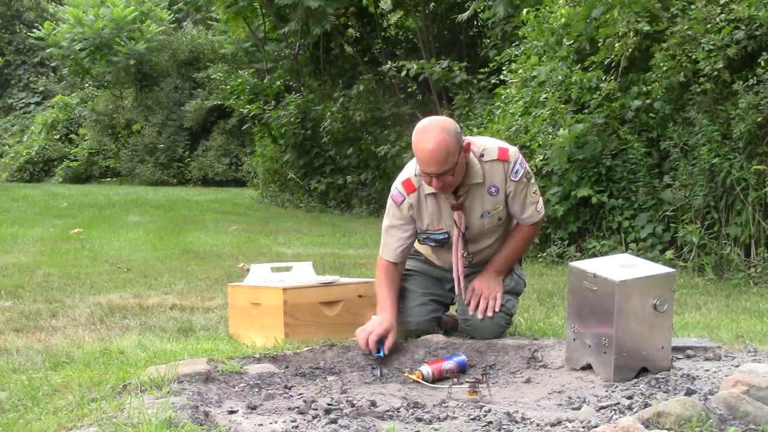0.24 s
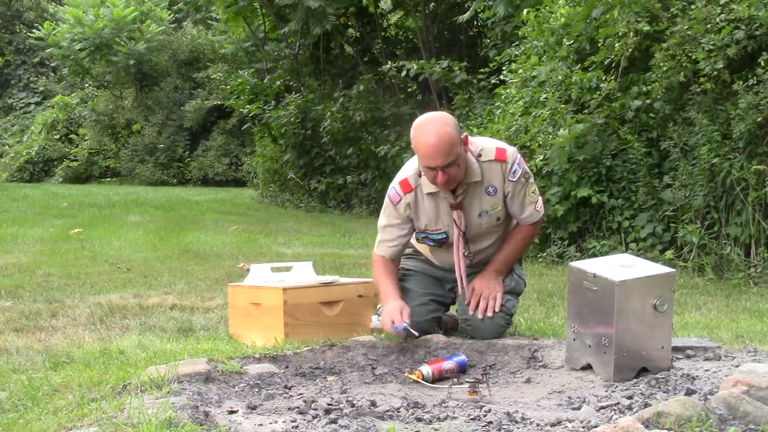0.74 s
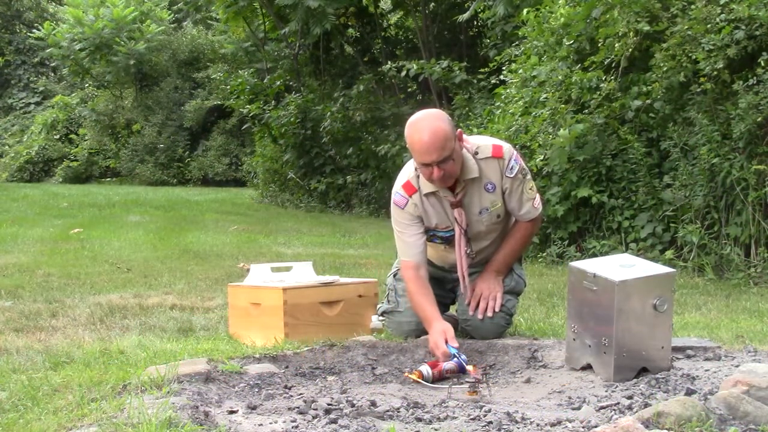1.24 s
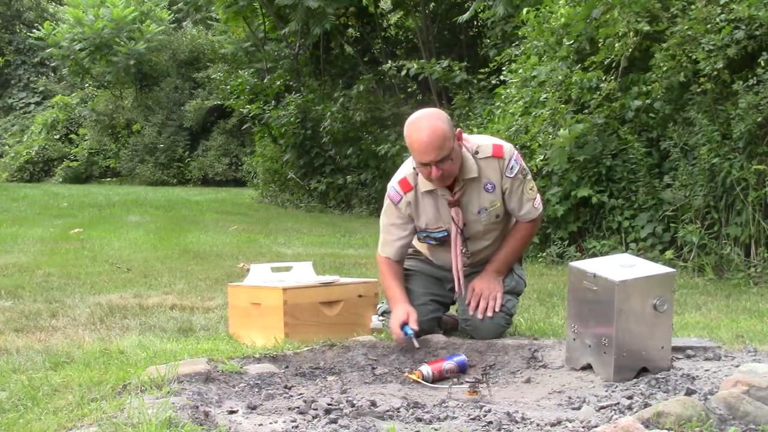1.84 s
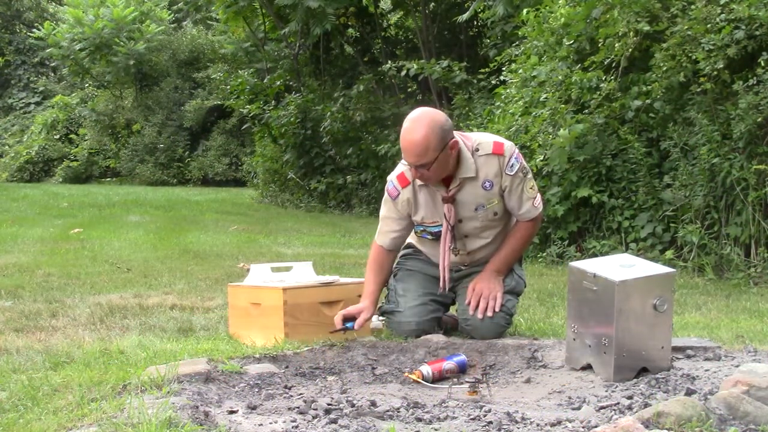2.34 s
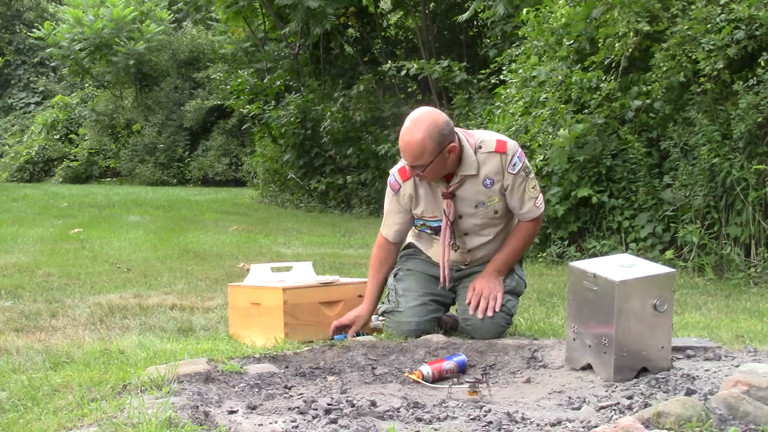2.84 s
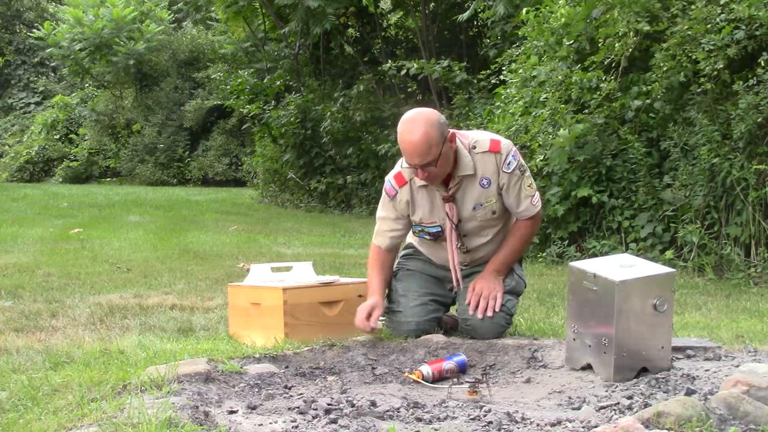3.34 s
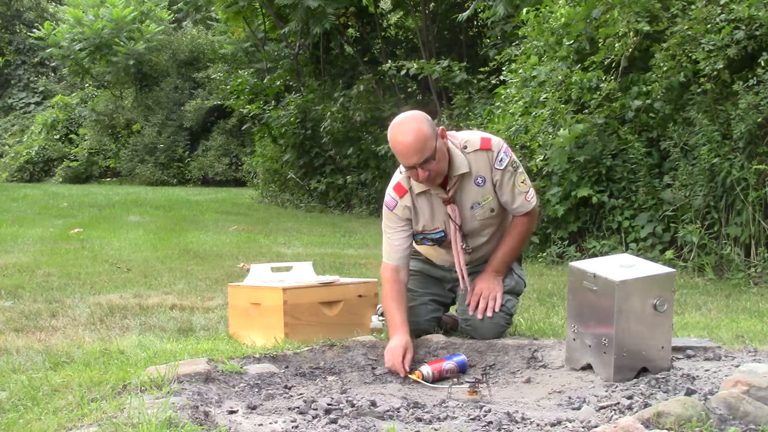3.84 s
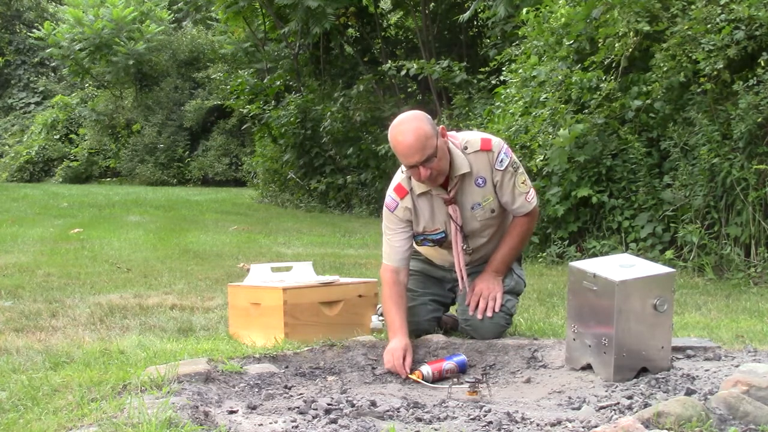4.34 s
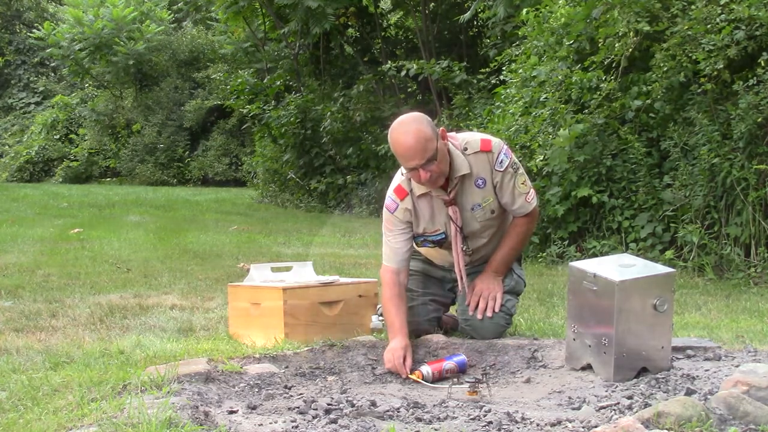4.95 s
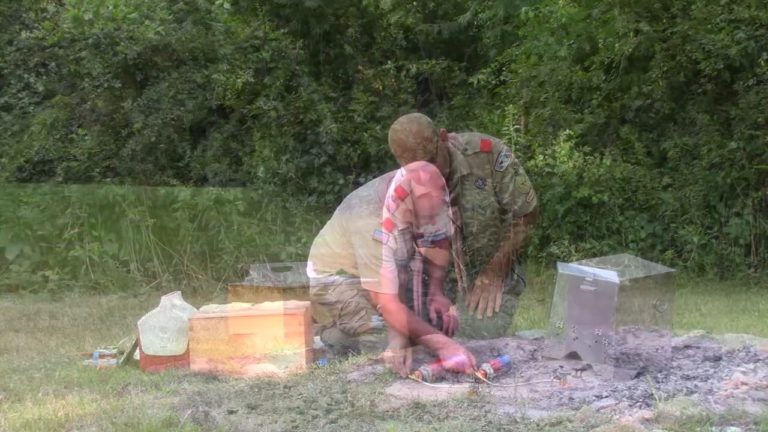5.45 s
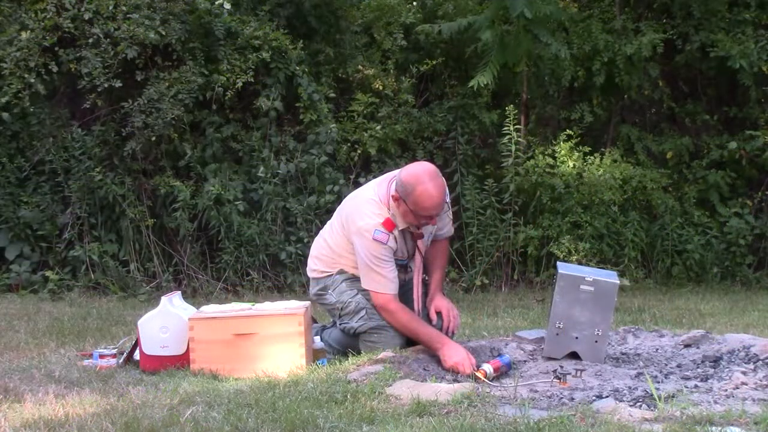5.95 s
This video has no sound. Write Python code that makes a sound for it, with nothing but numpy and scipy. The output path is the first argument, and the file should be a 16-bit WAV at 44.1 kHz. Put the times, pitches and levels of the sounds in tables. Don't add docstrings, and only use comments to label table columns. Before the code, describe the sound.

Thin whistling gas hiss, plastic clicks and two sharp lighter snaps, a soft whoomp of ignition, then steady flame, duller and stronger at the end.

```python
import sys
import numpy as np
from scipy import signal
from scipy.fft import irfft
from scipy.io import wavfile

SR = 44100
rng = np.random.default_rng(int(sys.argv[2]) if len(sys.argv) > 2 else 0)


def decibels_to_gain(level_db):
    exponent = np.asarray(level_db, float) / 20
    return 10 ** exponent


def master(y):
    cut = np.clip(np.atleast_2d(y).T, -1, 1)
    pcm = np.round(cut * 32767)
    wavfile.write(sys.argv[1], SR, pcm.astype(np.int16))


N = 273420
TIME_S = np.arange(N) / SR
CATCH_S = 1.2582
CUT_S = 5.397

# pitch_hz, level_db [dB per Hz]
RUMBLE_COLOUR = [(8.8, -37), (15, -20), (64, -5.5), (86, -8.5), (124, -13), (142, -8), (173, -12.5),
                 (226, -14), (644, -20), (800, -30.5), (1040, -52), (1760, -120)]


def in_time(rows):
    s, *columns = np.transpose(rows)
    return [np.interp(TIME_S, s, c) for c in columns]


def swells(rows):
    return sum(rise * np.exp(-np.abs((TIME_S - s) / width) ** 3.3) for s, rise, width in rows)


def rms_one(x):
    return x / np.sqrt(np.mean(x ** 2) + 1e-20)


def drift(rate):
    r = np.exp(-80 * np.pi * rate / SR)
    chance = rng.standard_normal(N // 40 + 2002)
    slow = signal.lfilter([1], [1, -2 * r, r * r], chance)[2000:]
    return np.interp(np.arange(N) / 40, np.arange(len(slow)), rms_one(slow))


def coloured(spectrum, low_hz, high_hz, shared_db, own_db, rate):
    hz = np.fft.rfftfreq(N, 1 / SR) + 1e-3
    points = np.array(spectrum)
    chance = rng.standard_normal(len(hz)) + 1j * rng.standard_normal(len(hz))
    noise = chance * decibels_to_gain(np.interp(np.log(hz), np.log(points[:, 0]), points[:, 1]))
    edges = np.geomspace(low_hz, high_hz, 2 + int(1.5 * np.log2(high_hz / low_hz)))
    together_db = shared_db * drift(rate)
    total = np.zeros(N)
    for low, high in zip(edges, edges[1:]):
        band = irfft(noise * (hz >= low) * (hz < high), N)
        total += decibels_to_gain(together_db + own_db * drift(rate)) * band
    return rms_one(total)


def narrow(hz, width_hz):
    lowpass = signal.butter(2, width_hz / 2, fs=SR, output="sos")
    slow = signal.sosfilt(lowpass, rng.standard_normal((2, N + SR)))[:, SR:]
    phase = 2 * np.pi * np.cumsum(hz * np.ones(N)) / SR
    return rms_one(slow[0] * np.cos(phase) + slow[1] * np.sin(phase))


def resonator(hz, width_hz):
    r = np.exp(-np.pi * width_hz / SR)
    return np.array([1, 0, -1]) * (1 - r * r) / 2, [1, -2 * r * np.cos(2 * np.pi * hz / SR), r * r]


def resonate(x, hz, width_hz):
    return signal.lfilter(*resonator(hz, width_hz), x)


def cancel(x, hz, depth, width_hz):
    band, state = np.zeros(N), np.zeros(2)
    for i in range(0, N, 1024):
        zeros, poles = resonator(hz[i], width_hz)
        band[i:i + 1024], state = signal.lfilter(zeros, poles, x[i:i + 1024], zi=state)
    return x - depth * band


def add(out, s, piece):
    i = round(s * SR)
    out[i:i + len(piece)] += piece[:N - i]


def blips(rows):
    out, t = np.zeros(N), np.arange(-1000, 1000) / SR
    for s, db, hz, width in rows:
        add(out, s + t[0], decibels_to_gain(db) * np.exp(-(t / width) ** 2) * np.cos(2 * np.pi * hz * t))
    return out


def jet_turbulence(flow_db, bright_db, lit, share):
    edges_hz = [2950, 5500, 9050, 11100, 15900]
    # pitch_hz, level_db [dB per Hz]
    cold_colour = [(1590, -35), (2700, -2), (3200, -7), (3530, -7), (3830, -10.5), (5630, 2.5), (6480, 11),
                   (8160, -11), (14200, -13), (15200, -11), (15900, -12)]
    # pitch_hz, level_db [dB per Hz]
    burning_colour = [(2900, -5), (3350, 1), (3900, 1.5), (5300, -5), (6050, -7), (6700, -1), (7200, -10.5),
                      (8300, -4.5), (9050, -7.5), (9900, -3), (10500, -7.5), (11200, -17), (13000, -18),
                      (15900, -17)]
    # unlit_db, burning_db [over the flow], tilt [share of the brightness change taken]
    regions = [(-2.5, -2.5, 0.01), (-8.5, -9, 0.79), (-17.5, -14, 1.4), (-17, -17.5, 1.2)]
    jet = np.zeros(N)
    for (cold_db, lit_db, tilt), low, high in zip(regions, edges_hz, edges_hz[1:]):
        cold = coloured(cold_colour, low, high, shared_db=1.5, own_db=3.0, rate=6.5)
        burning = coloured(burning_colour, low, high, shared_db=0.5, own_db=1.14, rate=18.0)
        db = flow_db + cold_db + lit * (lit_db - cold_db) + tilt * bright_db
        jet += decibels_to_gain(db) * (np.sqrt(1 - share) * cold + np.sqrt(share) * burning)
    return jet


def whistles(flow_db, nozzle_hz, lit, share):
    # start_s [centre], rise_db, width_s
    nozzle_swells = [(.63, 4, 0.069), (.84, 5.5, 0.046), (1.05, 5, 0.19), (1.85, -2, .15), (2.75, -2, 0.16),
                     (3.05, -3, 0.096), (3.55, 1, 0.11), (4.3, 2, 0.2), (4.76, -5.5, 0.19),
                     (5.2, 1.5, 0.12)]
    # start_s [centre], rise_db, width_s
    middle_swells = [(.45, 2, .1), (.76, 6, 0.056), (1.55, 8, 0.19), (1.9, 5, 0.19), (2.35, 7.5, .2),
                     (3.35, 6, .15), (3.55, 3, 0.036), (4.1, 0, 0.21), (4.9, 2, 0.11), (5.23, 8, 0.19)]
    top_swells = [(2.05, 11, 0.16), (2.72, 3.7, 0.09), (3.15, 3.4, 0.046), (3.55, 5.5, 0.054),
                  (4.0, 12, 0.09), (4.22, 9.7, 0.091), (4.85, 6.2, 0.2), (5.2, 8.7, 0.14)]
    # start_s, pitch_hz
    top_pitch = [(1.4, 9850), (2.1, 10080), (2.6, 10000), (2.72, 10450), (3.05, 9900), (3.15, 10400),
                 (3.55, 10150), (3.9, 9950), (5.05, 9950), (5.39, 10150)]

    nozzle_db = flow_db - 5.5 + 0.5 * lit + swells(nozzle_swells) + 1.3 * drift(2.3)
    nozzle = decibels_to_gain(nozzle_db) * narrow(nozzle_hz, width_hz=550)

    middle_hz = 7450 - 250 * lit
    middle_db = flow_db - 13.5 + swells(middle_swells) + 1.5 * drift(6.0)
    middle = decibels_to_gain(middle_db) * narrow(middle_hz, width_hz=970)

    top_hz = in_time(top_pitch)[0] * (1 + 0.01 * drift(2.5))
    top_db = flow_db - 18 + swells(top_swells) + 2.8 * drift(5.5)
    top = share * decibels_to_gain(top_db) * narrow(top_hz, width_hz=560)
    return nozzle + middle + top


def rim_sizzle(flow_db):
    rim_swells = [(1.57, 8, .04), (2.25, 11, 0.38), (3.4, 7, 0.19), (4.7, 1, 0.2), (5.27, 11, .12)]
    return decibels_to_gain(flow_db - 28 + swells(rim_swells)) * narrow(14800, width_hz=1600)


def gas_hiss():
    # start_s, flow_db, nozzle_hz, bright_db [at tilt 1]
    valve = [(0.0, -51, 6400, 2), (.22, -49, 5650, 1), (.4, -50, 6400, 2), (.62, -49.5, 5750, 3),
             (.75, -49, 6530, 3), (.88, -50.5, 6400, -2), (.93, -47.5, 5620, 3.5), (1.18, -50, 5470, 0),
             (1.3, -52, 6000, 2), (1.6, -52.5, 5490, 3), (1.9, -55.5, 6100, 3.5), (2.4, -51.5, 6420, -2.5),
             (2.65, -54.5, 5990, -1), (3.2, -55.5, 6100, 1.5), (3.95, -49.5, 6040, -2.5),
             (4.6, -49, 5990, -3), (4.97, -49, 5850, -5), (5.03, -48, 6100, -2.5), (5.09, -47.5, 6100, -4),
             (5.13, -47.5, 6100, -1.5), (5.38, -48, 6120, 4.5)]
    # start_s [centre], change_db [at tilt 1], width_s
    shades = [(1.53, -3, .04), (1.75, 0, .1), (2.1, 1, 0.13), (3.03, -7, 0.052), (3.68, -7, 0.046),
              (4.38, -4, .04), (4.22, 4, .03), (5.3, -1.5, .08)]
    # start_s, share of the burning colour [0-1]
    settled = [(1.25, 0.44), (1.9, 0.86), (3.4, 0.96), (3.75, 0.98)]
    flow_db, nozzle_hz, bright_db = in_time(valve)
    bright_db = bright_db + swells(shades)
    share = np.clip(in_time(settled)[0], 0, 1)
    lit = np.clip((TIME_S - CATCH_S) / .3, 0, 1)
    jet = jet_turbulence(flow_db, bright_db, lit, share)
    jet = jet + whistles(flow_db, nozzle_hz, lit, share) + rim_sizzle(flow_db)
    return (TIME_S < CUT_S) * jet


def far_engine():
    # start_s, level_db
    load = [(0, -47), (.55, -48.5), (.72, -48.5), (.9, -47.5), (1.2, -46), (1.5, -52), (2.1, -50.5),
            (3.0, -46), (3.8, -50.5), (4.5, -45.5), (5.3, -49.5), (5.45, -44), (5.7, -53), (6.05, -48)]
    # pitch_hz, level_db, pitch wobble [0-1]
    hum_tones = [(58.7, -47.5, 0.01), (117.1, -50, 0)]
    (rumble_db,) = in_time(load)
    rumble = decibels_to_gain(rumble_db) * coloured(RUMBLE_COLOUR, 38, 800, shared_db=2.05, own_db=2.0, rate=4.4)
    hum = np.zeros(N)
    for hz, db, wobble in hum_tones:
        phase = 2 * np.pi * np.cumsum(hz * (1 + wobble * drift(6.1))) / SR
        hum_db = db + 0.82 * (rumble_db + 42.5) + 1.1 * drift(4.8)
        hum += decibels_to_gain(hum_db) * np.sqrt(2) * np.sin(phase)
    return rumble + (TIME_S < CUT_S) * hum


def wind():
    gusts = [(.05, 10, 0.13), (.5, 11, 0.073), (1.25, 15, 0.6), (1.85, 7, .15), (3.7, 5, .2), (5.1, 7, .3),
             (5.5, 13, 0.11), (6.05, 21, 0.3)]
    wind_db = -60 + swells(gusts)
    push = decibels_to_gain(wind_db) * coloured(RUMBLE_COLOUR, 8.1, 41, shared_db=5.0, own_db=0.0, rate=4.0)
    buffet = decibels_to_gain(wind_db - 2.5) * coloured(RUMBLE_COLOUR, 45, 120, shared_db=0.0, own_db=1.0, rate=5.3)
    return push + (TIME_S > CUT_S) * buffet


def leaves():
    # start_s, level_db
    breeze = [(0.0, -59), (0.13, -55), (0.31, -54), (0.75, -59.5), (1.11, -51.5), (1.87, -57.5),
              (2.01, -58), (2.34, -59.5), (3.21, -58.5), (5.02, -57.5), (5.38, -54.5)]
    # pitch_hz, level_db [dB per Hz]
    rustle_colour = [(600, -15), (800, -8.5), (1100, -6.5), (1800, -7), (2400, -8), (2700, -8), (2950, -6)]
    (breeze_db,) = in_time(breeze)
    low = coloured(rustle_colour, 600, 1800, shared_db=1.8, own_db=0.8, rate=6.3)
    high = coloured(rustle_colour, 1800, 2925, shared_db=1.0, own_db=1.5, rate=2.1)
    return (TIME_S < CUT_S) * decibels_to_gain(breeze_db - 2) * (low + high)


def bird():
    # start_s, pitch_hz, level_db
    notes_sung = [
        [(.14, 3560, -62), (.17, 3510, -56), (.22, 3470, -54), (.265, 3480, -61)],
        [(.285, 3430, -61), (.33, 3380, -52), (.37, 3330, -61), (.44, 3170, -62)],
    ]
    out = np.zeros(N)
    for note in notes_sung:
        hz, db = in_time(note)
        edge = np.clip(np.minimum(TIME_S - note[0][0], note[-1][0] - TIME_S) / 0.0084, 0, 1)
        out += np.sqrt(2) * edge * decibels_to_gain(db) * np.sin(2 * np.pi * np.cumsum(hz) / SR)
    return out


def swishes():
    brushes = [
        (.27, -50, 0.024),
        (.735, -52, 0.037),
        (1.935, -55.5, 0.028),
        (3.1, -54.5, 0.053),
        (5.92, -63, .02),
    ]
    swell = sum(decibels_to_gain(db) * np.exp(-((TIME_S - s) / width) ** 2) for s, db, width in brushes)
    band = signal.butter(2, [900, 5000], "band", fs=SR, output="sos")
    return swell * decibels_to_gain(1.9 * drift(90.0)) * rms_one(signal.sosfilt(band, rng.standard_normal(N)))


def handling():
    # start_s [centre], level_db, pitch_hz, width_s
    squeaks = [
        (.282, -45, 1750, .002),
        (.294, -41, 1750, .002),
        (.3145, -34, 1740, 0.0025),
        (.322, -42, 1800, 0.0018),
        (.724, -46, 2750, .004),
        (.738, -47, 2500, .005),
    ]
    # start_s, peak_db, pitch_hz, length_s, share of broad crackle [0-1]
    ticks = [(0.271, -40.5, 1820, 0.0043, 0.7), (0.4556, -31, 1580, 0.0023, 0.57),
             (0.463, -30, 1280, 0.0012, 0.15), (0.4575, -36, 2090, 0.004, 0.1),
             (0.4655, -35, 1050, 0.0012, 0), (0.456, -43, 7000, 0.0023, 0.1),
             (0.4605, -40, 650, 0.003, 0.3), (0.474, -38, 7000, 0.0015, 0.05),
             (0.479, -43, 1900, 0.002, 0.3), (0.495, -45, 1800, 0.0015, 0.4),
             (0.504, -46, 1200, 0.0015, 0.4), (0.466, -41, 1620, 0.004, 0.4),
             (0.689, -36.5, 6100, 0.0018, 0.4), (0.6884, -44, 8800, 0.002, 0.05),
             (0.6887, -48, 11900, 0.0015, 0.05), (0.7832, -45, 10300, 0.0015, 0.1),
             (0.79, -40, 2000, 0.002, 0.5), (0.936, -45, 3980, 0.002, 0.7),
             (1.0788, -30.5, 4700, 0.0015, 0), (1.079, -38, 1930, 0.003, 0.43),
             (1.1785, -33, 1630, 0.00096, 0.15), (1.458, -36, 1770, 0.0072, 0.57),
             (1.4657, -28.5, 2980, 0.0013, 0.7), (1.514, -43, 2600, 0.0028, 0.3),
             (3.061, -47, 1500, 0.0018, 0.56), (5.395, -44, 6200, 0.003, 0.4)]
    # start_s, peak_db, pitch_hz
    bumps = [
        (0.381, -27, 95),
        (0.491, -23, 119),
        (0.543, -26, 98.8),
        (.86, -30, 402),
        (1.927, -32, 60),
        (3.716, -32, 59.8),
        (5.39, -30, 50),
    ]
    out, t = blips(squeaks), np.arange(round(.08 * SR)) / SR
    for s, db, hz, length, broad in ticks:
        burst = rng.standard_normal(len(t)) * np.minimum(t / 0.00012, 1) * np.exp(-t / max(length, 5e-4))
        broad = np.clip(broad, 0, 1)
        crackle = resonate(resonate(burst, 3000, 5300), 3000, 5300)
        tone = 4.6 * resonate(burst, hz, 0.18 * hz)
        tick = broad * crackle + (1 - broad) * tone
        add(out, s, decibels_to_gain(db + 7.0) * tick / np.abs(tick).max())
    for s, db, hz in bumps:
        swing = np.sin(2 * np.pi * (hz * t) ** 0.68)
        add(out, s, decibels_to_gain(db - 2.5) * swing * np.exp(-t * hz) * np.minimum(t / 0.00049, 1))
    return out


def snaps():
    # start_s, level_db, rise_s
    blows = [
        (0.8826, -26, 0.00026),
        (0.8856, -5.5, 0.00052),
        (1.22, -9, 0.0004),
    ]
    # pitch_hz, level_db, t60_s
    catch_modes = [(600, 5, 0.0042), (2800, 2, .008), (5100, 6, 0.0063), (6100, -3, .008),
                   (9000, -11, .007)]
    first_modes = [(417, -17, 0.012), (1700, 3, 0.01), (2250, 3, 0.0069), (3070, 2, 0.01),
                   (3570, 2, 0.0085), (4310, -2.5, 0.015), (5320, 0.5, 0.0087), (6100, 1, 0.01),
                   (6400, -20, 0.096), (7830, -9, 0.02), (8600, 0.5, 0.0079), (9100, -11, 0.017),
                   (9400, -9, 0.009), (10400, -13, .01), (11200, -12, 0.034), (11360, -9, 0.009),
                   (11150, -8, 0.012), (12700, -9, 0.0089), (13100, -18, .012), (14260, -15, .014),
                   (15200, -12, .009), (15800, -19, .011)]
    second_modes = [(1130, -8.5, 0.02), (1700, 3.5, 0.0092), (1940, 3.5, 0.011), (2450, -5, 0.016),
                    (2700, -17.5, 0.09), (2970, -10.5, 0.014), (3490, -9.5, 0.019), (4380, 1.5, 0.0087),
                    (4690, 0, 0.005), (5030, 1, 0.0074), (6200, -6, 0.021), (7330, -6, 0.0084),
                    (7750, -8, 0.008), (8400, -10, 0.011), (9370, -13.5, 0.009), (8900, -4, .009),
                    (10840, 5, 0.013), (12000, -2, .008), (12460, 1, 0.0074), (13500, -13, 0.007),
                    (15100, 3, 0.0072), (16030, -1.5, .007), (16100, -18.5, .006)]
    out, t = np.zeros(N), np.arange(round(.08 * SR)) / SR
    highpass = signal.butter(3, 1150, "high", fs=SR, output="sos")
    for (s, db, rise), modes in zip(blows, (catch_modes, first_modes, second_modes)):
        for hz, mode_db, t60 in modes:
            turn, wait = rng.random(2)
            fall = (t / (0.72 * t60)) ** (1.6 if t60 < .025 else 1)
            onset = 1 - np.exp(-(t / rise) ** 2)
            ring = decibels_to_gain(mode_db - 60 * fall) * np.sin(2 * np.pi * (hz * t + turn)) * onset
            add(out, s + 0.00054 * wait, decibels_to_gain(db - 2.5) * ring)
        crack = resonate(rng.standard_normal(len(t)) * np.exp(-(t / 0.0021) ** 2), 3800, 7000)
        crack = signal.sosfilt(highpass, resonate(crack, 4500, 9000))
        add(out, s, decibels_to_gain(db - 6.5) * crack)
        shake = rng.standard_normal(len(t)) * np.minimum(t / .0015, 1) * np.exp(-t / 0.0045)
        add(out, s, decibels_to_gain(db - 16.0) * resonate(shake, 9000, 12000))
    return out


def ignition():
    # start_s [centre], pressure [-1..1], width_s
    puff = [
        (1.247, 0.18, 0.0035),
        (1.2582, -0.78, 0.0024),
        (1.265, 0.25, 0.0072),
    ]
    # start_s [centre], level_db, pitch_hz, width_s
    rasp = [
        (1.2523, -15, 268, 0.003),
        (1.2578, -10.5, 394, 0.0016),
    ]
    thump = sum(p * np.exp(-((TIME_S - s) / width) ** 2) for s, p, width in puff)
    return thump + blips(rasp)


def flame():
    # start_s, level_db
    strength = [(1.29, -26.5), (1.41, -30.5), (1.44, -27), (1.51, -34), (1.58, -28), (1.64, -34),
                (2.63, -35.5), (2.74, -36.5), (3.96, -33.5), (4.0, -34.5), (5.24, -34), (5.38, -32),
                (5.42, -30), (5.55, -29.5), (6.19, -32.5), (6.2, -35)]
    # pitch_hz, level_db [dB per Hz]
    flame_colour = [(53, -38), (90, -8.5), (195, -1), (371, 1), (505, -7.5), (578, -14.5), (707, -31),
                    (900, -52), (1170, -69), (1980, -120)]
    age = TIME_S - CATCH_S
    lit = np.clip(age / 0.0047, 0, 1)
    rush = coloured(flame_colour, 70, 1000, shared_db=0.5, own_db=0.23, rate=49.0)
    top = signal.sosfiltfilt(signal.butter(2, 453, "high", fs=SR, output="sos"), rush)
    muffle = np.where(TIME_S < CUT_S, 0.62 * np.exp(-(age / 0.7) ** 2), 0.18)
    return lit * decibels_to_gain(in_time(strength)[0]) * (rush - muffle * top)


def hand_echo():
    # start_s, pitch_hz, level_db
    echo_path = [(1.5, 6000, -78), (1.58, 5200, -61), (1.67, 3600, -56), (1.76, 2800, -63),
                 (1.9, 1600, -67), (2.0, 1200, -80)]
    hz, db = in_time(echo_path)
    return decibels_to_gain(db) * narrow(hz, width_hz=990)


def can_reflections(x):
    # start_s, pitch_hz [centre], depth [0-1]
    main_valley = [(1.8, 3160, 0.15), (2.1, 3250, 0.6), (3.4, 3200, 0.47), (3.8, 2980, 0.64),
                   (4.4, 2950, 0.91), (5.39, 2956, 0.8), (5.396, 3000, .0)]
    upper_valley = [(1.45, 8730, 0.46), (1.55, 8900, 0.3), (1.9, 8900, 0.1), (2.15, 8600, 0.7),
                    (2.9, 8700, .3), (3.6, 8900, .2), (3.8, 9100, 0.4), (5.39, 9150, .6), (5.396, 9150, .0)]
    nozzle_valley = [(2.5, 6700, .0), (2.8, 6700, .3), (3.6, 6700, .1), (3.85, 6600, .6), (4.5, 6650, .6),
                     (4.7, 6650, 0.16), (5.05, 6500, 0.5), (5.39, 6600, .4), (5.396, 6660, .0)]
    for valley, width_hz in ((main_valley, 1100), (upper_valley, 700), (nozzle_valley, 300)):
        hz, depth = in_time(valley)
        x = cancel(x, hz, np.clip(depth, 0, 1), width_hz)
    return x


def later_hiss():
    # start_s, level_db
    later_level = [(5.4, -49.5), (5.8, -51), (6.2, -51.5)]
    # pitch_hz, level_db [dB per Hz]
    later_colour = [(410, -37), (700, -12.5), (1040, -1.5), (1770, -10), (2980, -13), (3570, -16.5),
                    (4460, -9.5), (6100, -8.5), (6950, -11.5), (7900, -22), (9020, -18), (12200, -29.5),
                    (15800, -27)]
    hiss = coloured(later_colour, 600, 15900, shared_db=0.1, own_db=0.5, rate=16.0)
    return (TIME_S > CUT_S - .005) * decibels_to_gain(in_time(later_level)[0]) * hiss


def scene():
    steady = gas_hiss() + far_engine() + wind() + leaves() + bird() + later_hiss()
    steady = can_reflections(steady)
    steady = signal.sosfilt(signal.ellip(10, .3, 80, 15720, fs=SR, output="sos"), steady)
    near = swishes() + handling() + snaps() + ignition() + flame() + hand_echo()
    return (steady + near)[None]


def roll_off(x):
    return signal.sosfilt(signal.butter(12, 17040, fs=SR, output="sos"), x)


def record(dry):
    limited = np.clip(dry, -.86, .86)
    dull = signal.sosfilt(signal.ellip(10, .3, 80, 16500, fs=SR, output="sos"), limited)
    return roll_off(dull)


dry = scene()
out = record(dry)
master(out)
```